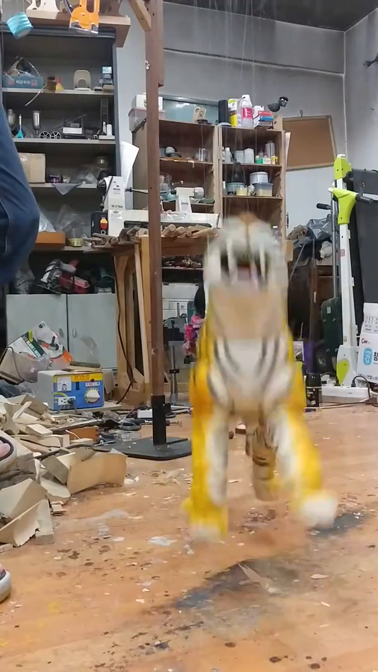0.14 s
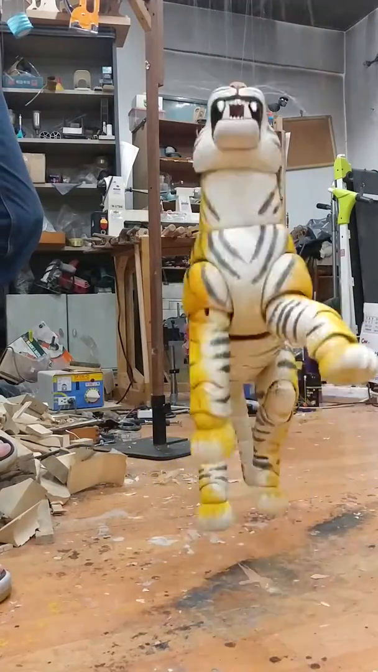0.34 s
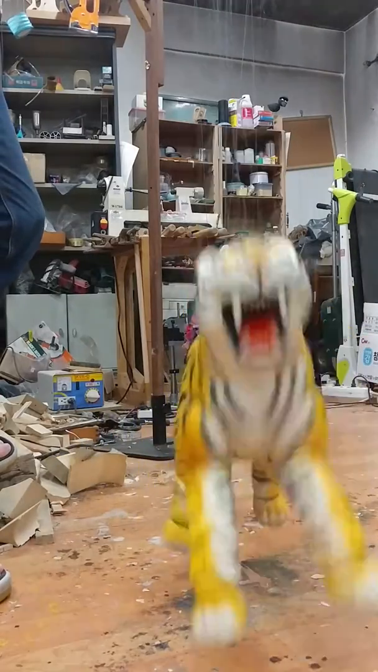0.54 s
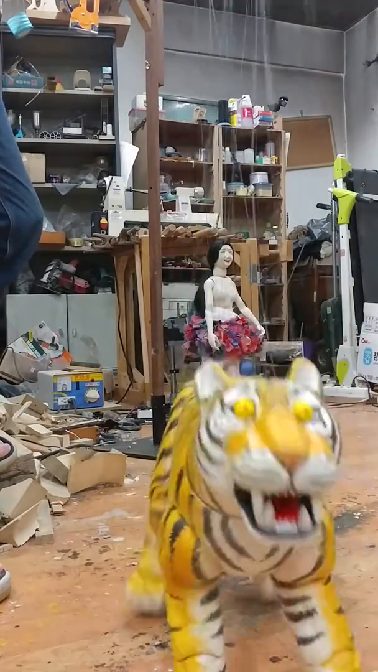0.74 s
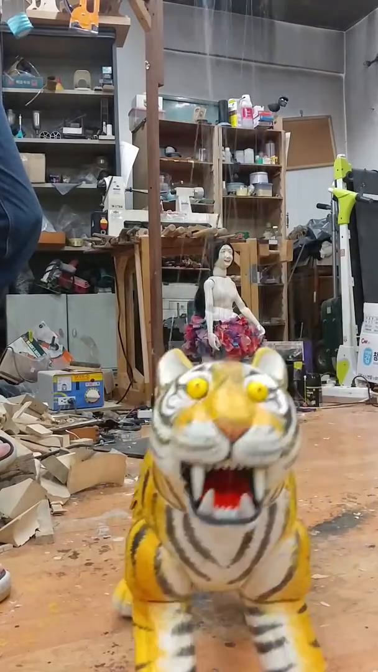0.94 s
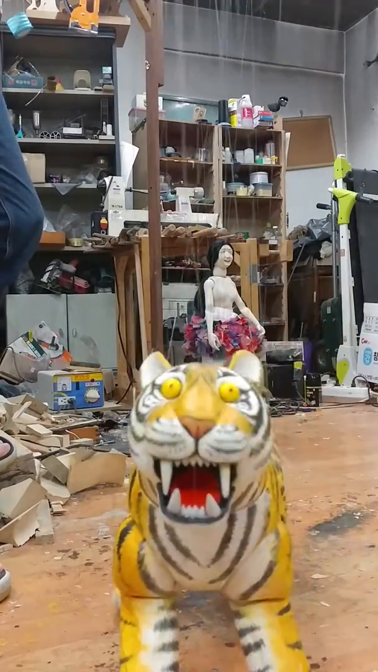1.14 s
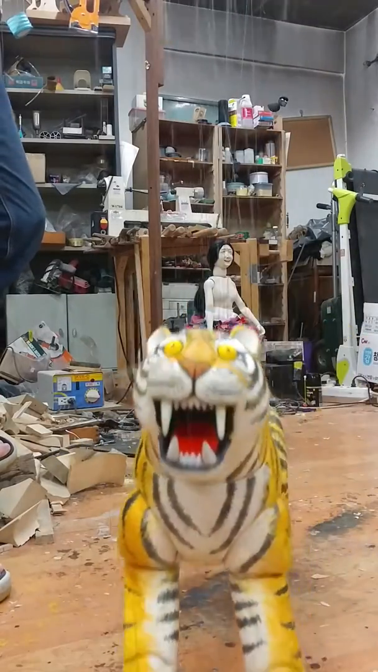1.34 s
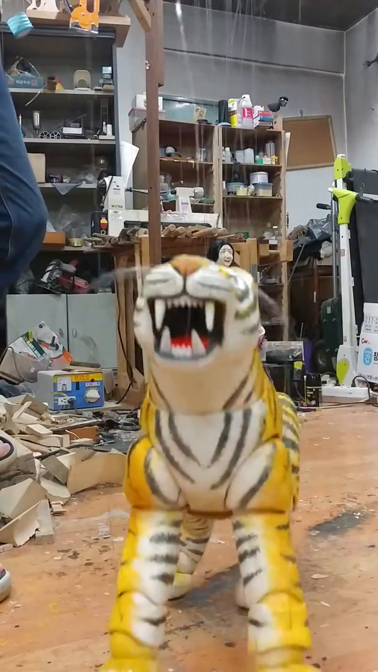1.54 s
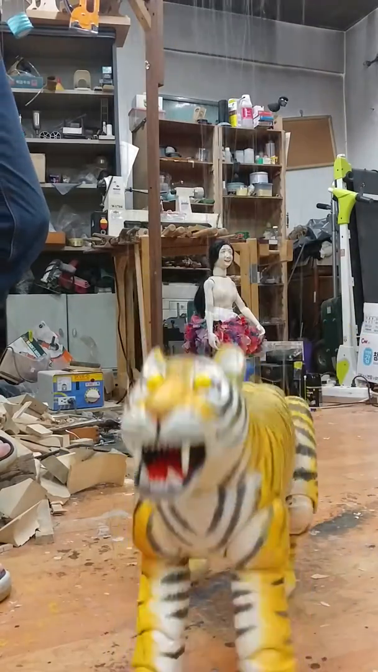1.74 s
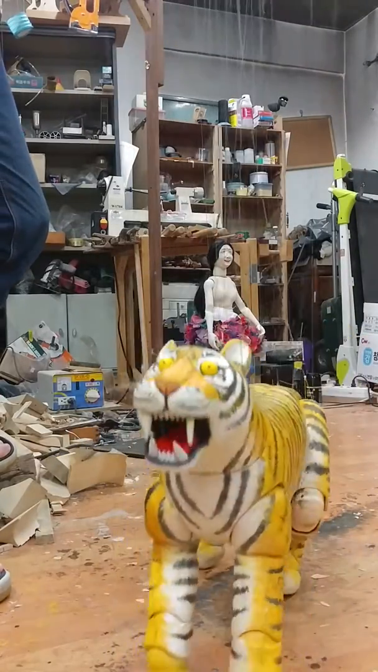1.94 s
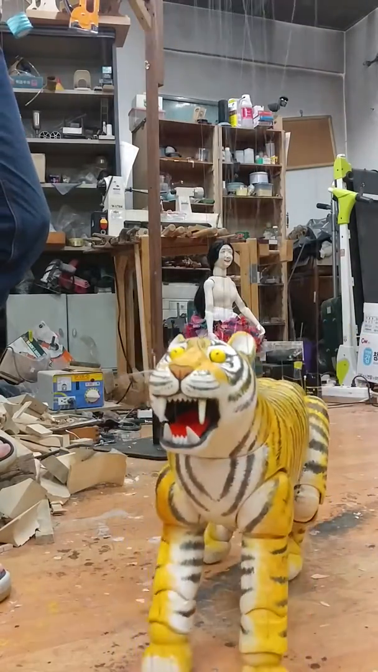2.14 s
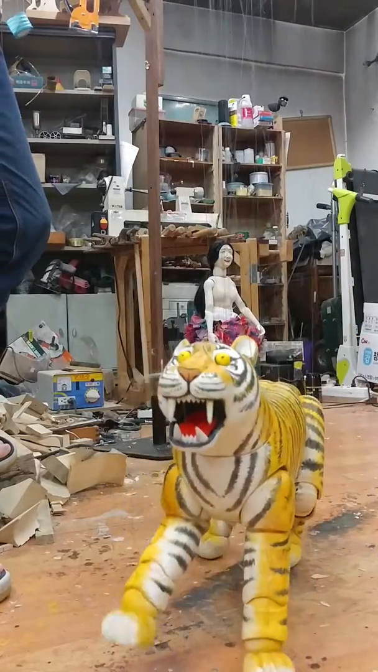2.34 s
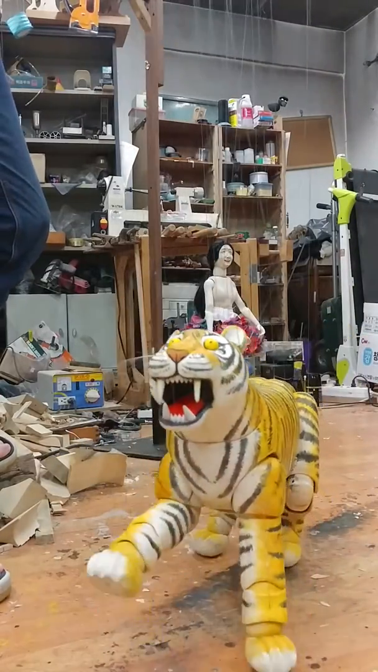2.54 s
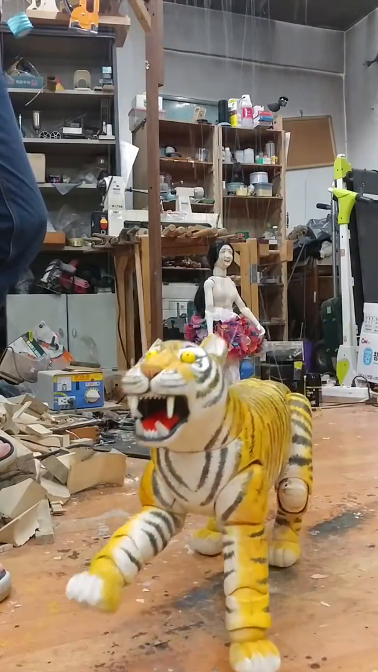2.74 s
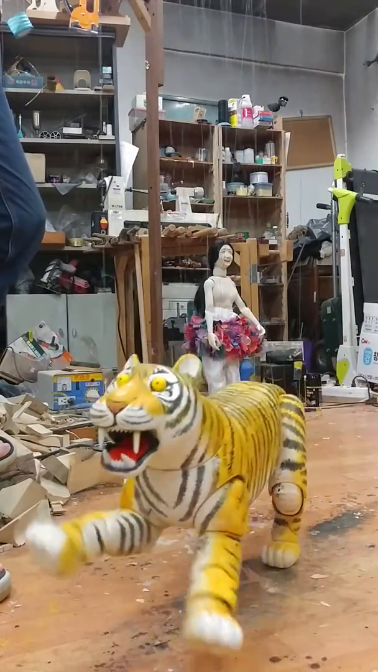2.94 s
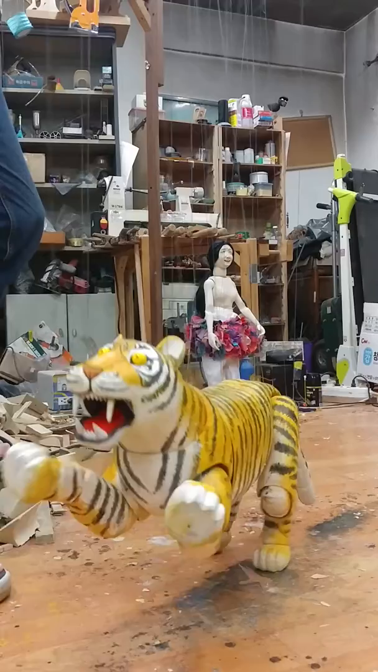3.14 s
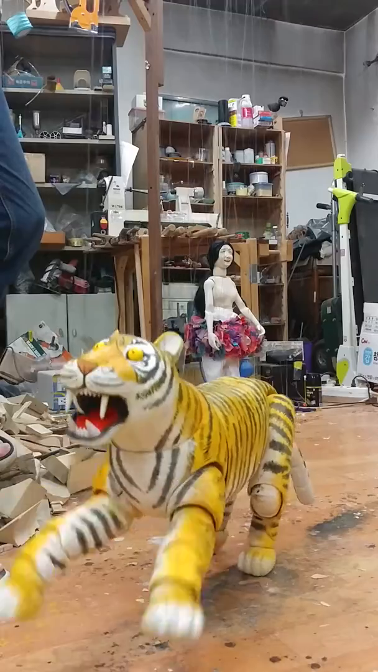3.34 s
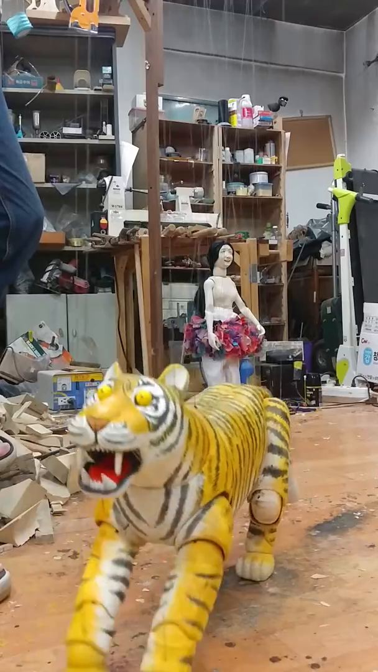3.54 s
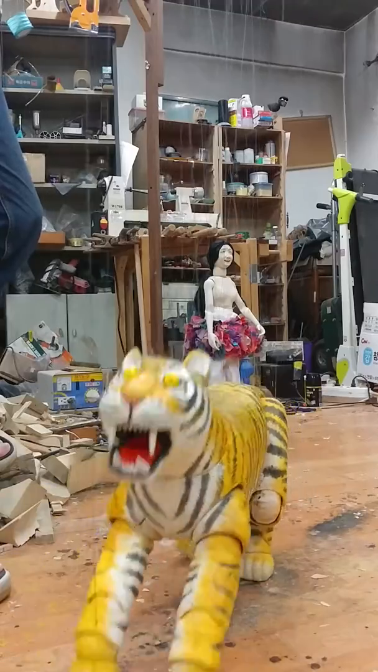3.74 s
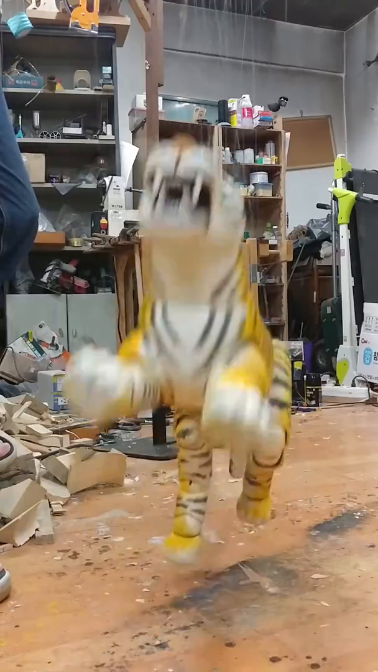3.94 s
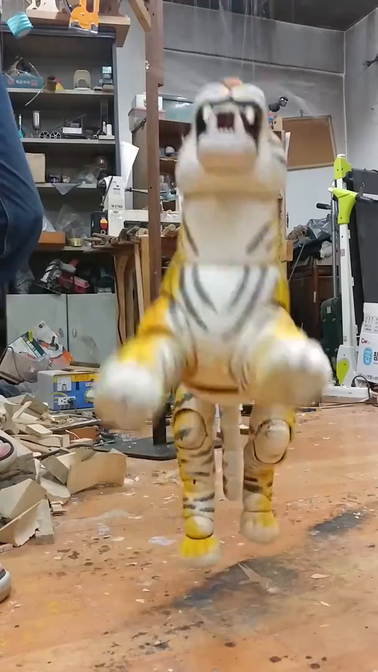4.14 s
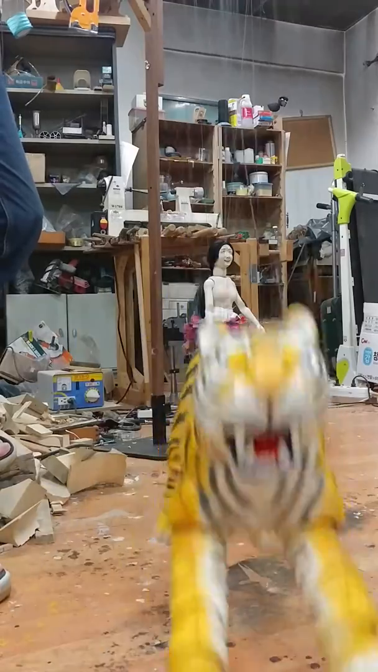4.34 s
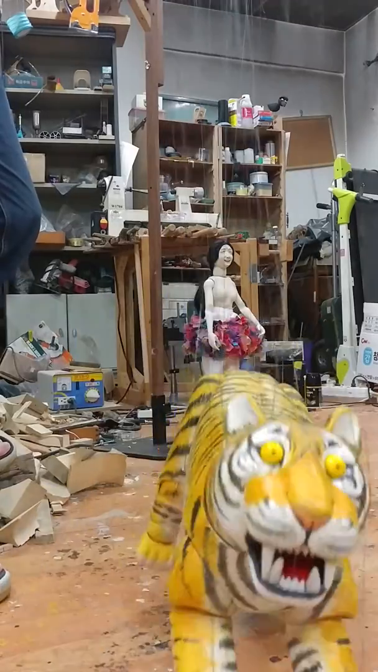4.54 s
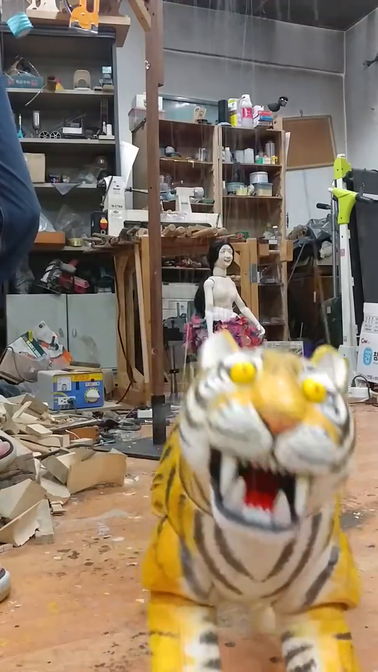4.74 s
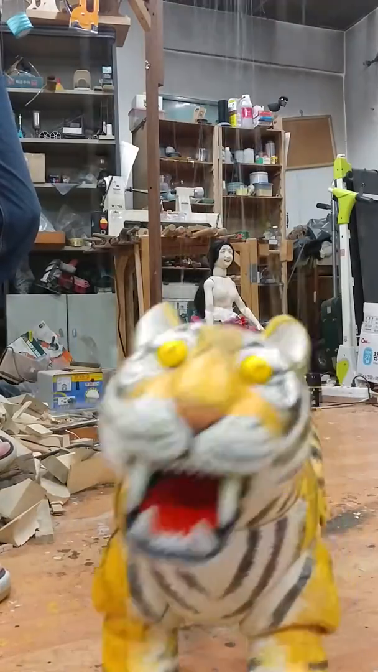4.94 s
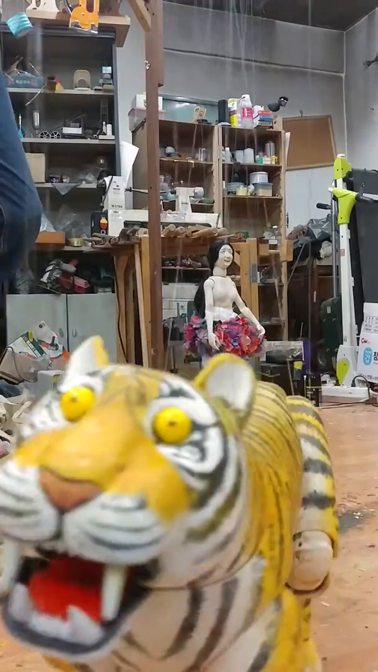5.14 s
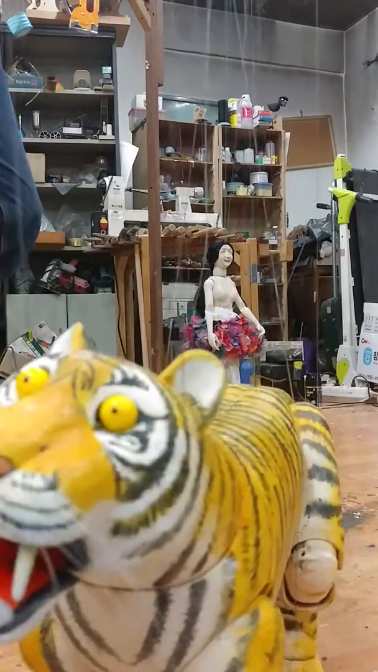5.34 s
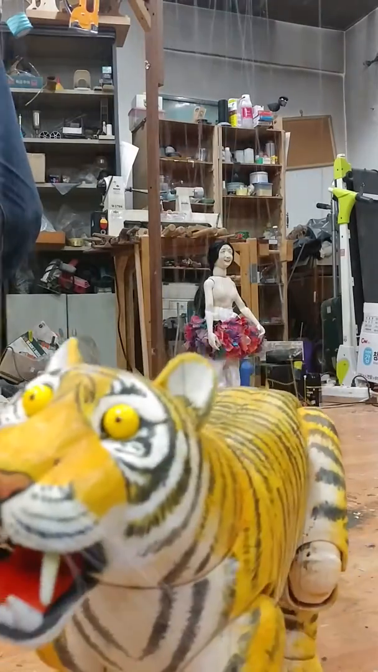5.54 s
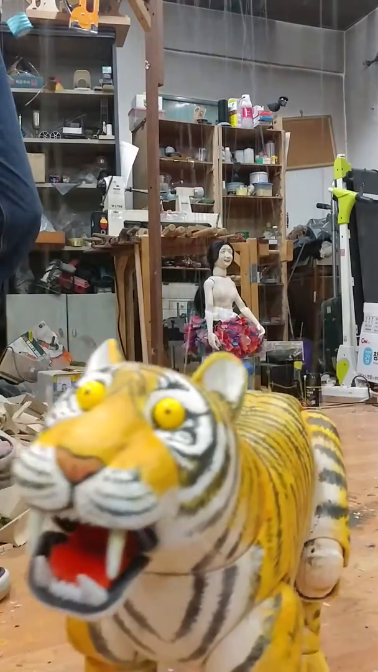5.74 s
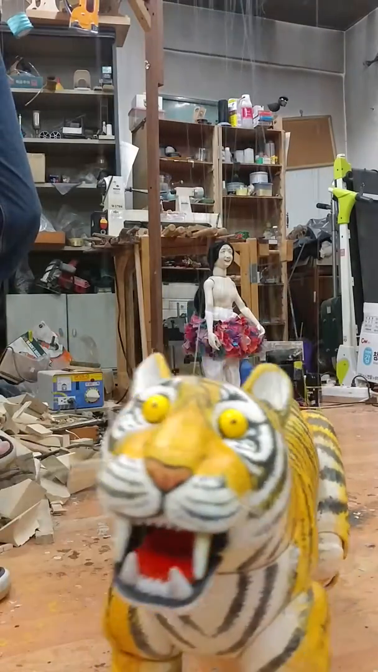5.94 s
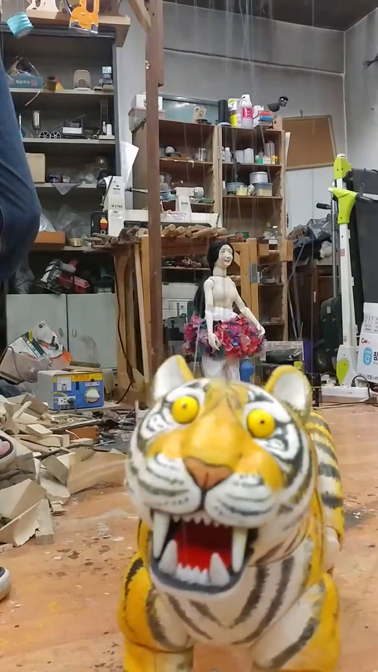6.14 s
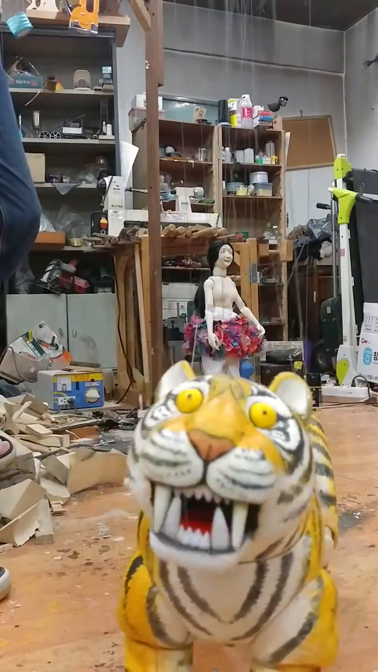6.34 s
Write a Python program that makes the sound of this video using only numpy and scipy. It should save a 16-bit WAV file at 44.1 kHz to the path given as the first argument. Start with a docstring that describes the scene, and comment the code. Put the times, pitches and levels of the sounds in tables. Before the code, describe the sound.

A jointed wooden tiger puppet is jumped on a plank floor. A loud, dense clatter of hollow thumps and sharp clacks fills the first second, then it fades to faint rustles. A short hard landing follows near two seconds, then tiny ticks, a medium clattering burst after four seconds, and smaller knocks fading away. Close stereo microphones, short dry workshop echo, light hiss.

```python
"""Cluttered workshop, plank floor: a carved wooden puppet on strings is jumped and walked.
Hollow body and paws thump and joints clack: decaying sines, plus noise cracks on the joints.
Dragged parts chatter and rasp, and lifted ones rustle: sprayed knocks and shaped noise.
Sparse workshop echoes follow; a narrow low noise band near 54 Hz rises with the knocks.
Two spaced microphones add level and time differences and their own hiss."""
import sys
import numpy as np
from scipy import signal
from scipy.fft import rfft, irfft, next_fast_len
from scipy.io import wavfile
from scipy.ndimage import uniform_filter1d

SR = 44100
rng = np.random.default_rng(int(sys.argv[2]) if len(sys.argv) > 2 else 0)


def bounce(signal):
    """Save signal as a 16-bit WAV file at the path given by the first command-line argument."""
    frames = np.transpose(np.atleast_2d(signal))
    limited = np.clip(frames, -1, 1)
    pcm = np.round(limited * 32767).astype(np.int16)
    wavfile.write(sys.argv[1], SR, pcm)


N = 285327

# Paw and body landings, levels before pan and echo: start_s, peak_db, pitch_hz
LANDINGS = [(0.0, -20, 192), (0.007, -17, 273), (0.068, -22, 380), (0.102, -23.5, 390), (0.21, -15.5, 308),
            (0.229, -24.5, 296), (0.531, -20.5, 299), (0.548, -27, 320.2), (0.617, -24.5, 336),
            (0.65, -27, 334), (0.704, -19.5, 226), (0.743, -13.5, 366), (0.756, -18.5, 208),
            (0.785, -31, 382), (0.819, -21, 218), (0.856, -13.5, 359), (0.921, -27, 330),
            (0.967, -27.5, 393), (1.078, -36.5, 215), (1.199, -45, 460), (1.499, -46, 379),
            (1.754, -34.5, 413), (1.77, -24, 220), (1.792, -16.5, 215), (1.813, -22.5, 222),
            (1.868, -20, 362), (1.989, -43.5, 202), (2.061, -48, 410), (2.097, -43.5, 362),
            (2.251, -49, 396), (2.292, -44, 409), (2.529, -51, 435), (2.846, -46.5, 239),
            (3.011, -41.5, 414), (3.033, -38.5, 393), (3.416, -44.5, 390), (3.507, -51, 360),
            (3.61, -38.5, 200), (4.037, -37, 355), (4.049, -34, 360), (4.31, -34, 362), (4.343, -25.5, 368),
            (4.379, -25.5, 390), (4.442, -28, 340), (4.49, -21, 195), (4.6, -23, 370), (4.864, -49, 423),
            (4.913, -43, 410), (4.997, -42.5, 501), (5.054, -30, 190), (5.142, -38.5, 188),
            (5.197, -33.5, 393), (5.566, -53.5, 373), (5.661, -56, 447), (5.948, -48.5, 173),
            (6.373, -44, 503), (6.414, -53.5, 248)]
# Joints knocking wood on wood: start_s, knock_peak_db, pitch_hz, crack_re_knock_db
JOINT_KNOCKS = [(0.0, -16, 950, 7), (0.008, -11, 2780, -12.5), (0.019, -10.5, 2060, -1.5),
                (0.045, -16.5, 3140, -14), (0.095, -17.5, 1500, -2.5), (0.115, -25, 1970, 3),
                (0.21, -25, 726, -53), (0.345, -40, 1017, -9), (0.532, -28.5, 950, -41),
                (0.569, -19, 1420, -30), (0.573, -21.5, 1250, -19), (0.577, -19.5, 3050, -22),
                (0.62, -12, 740, -14), (0.65, -28.5, 3000, -7), (0.672, -17, 920, -4.5),
                (0.704, -11, 2240, -7.5), (0.716, -29, 2080, -6.5), (0.749, -27, 2600, -15),
                (0.784, -23, 1410, -28), (0.793, -19.5, 710, -18), (0.819, -14.5, 764, -13),
                (0.859, -20.5, 970, -5), (0.969, -35, 1430, -23), (0.967, -36, 3400, -30),
                (1.014, -33.5, 1520, -12.5), (1.177, -46, 980, -23.5), (1.198, -41.5, 830, -10.5),
                (1.769, -22, 2680, -0.5), (1.78, -16.5, 2880, -16), (1.788, -21.5, 1370, 5),
                (1.795, -17.5, 980, -1), (1.814, -20, 870, 0), (1.991, -35, 3030, -21),
                (2.842, -54.5, 950, 6.5), (2.88, -48, 2080, -10.5), (3.029, -44, 1580, -17),
                (3.166, -47, 1720, -19), (3.201, -61, 1500, -10), (3.232, -48, 1725, -21),
                (3.522, -50.5, 1500, -29), (3.613, -40.5, 800, -10), (3.938, -43.5, 2030, 6),
                (3.956, -41.5, 2520, -12), (3.978, -36.5, 2900, -11), (4.047, -41, 990, -4),
                (4.101, -43, 945, -1), (4.114, -39, 1070, -24), (4.136, -36.5, 1620, 0.5),
                (4.211, -40, 816, -31), (4.249, -41.5, 1150, -7), (4.278, -26.5, 1430, -21),
                (4.302, -24.5, 1900, -4), (4.318, -32.5, 2800, -1), (4.347, -17, 815, -16),
                (4.377, -20.5, 2860, -14), (4.435, -26.5, 810, -17), (4.491, -18.5, 2240, 2.5),
                (4.503, -35, 2140, -10), (4.6, -30.5, 787, -38), (4.652, -31, 1940, -14),
                (4.676, -43.5, 2900, -21), (4.796, -49, 2080, -8), (4.818, -47, 2330, -4),
                (4.855, -46, 1990, -28), (4.905, -53.5, 3000, 9.5), (4.914, -34.5, 890, -11),
                (4.93, -40, 890, -10), (4.989, -37.5, 2420, -15), (4.996, -38.5, 810, -28),
                (5.009, -37, 1220, -11), (5.111, -32, 1650, -15), (5.124, -28, 1490, -18),
                (5.139, -32.5, 660, 0), (5.163, -28, 778, -24), (5.236, -47.5, 1505, 9),
                (5.485, -53.5, 950, -17.5), (5.566, -49, 790, -28), (5.654, -57, 2630, -12.5),
                (6.028, -55.5, 2700, -1.5), (6.372, -38, 2900, -20.5)]
# Hollow body modes: mode_hz, relative_db, t60_s
BODY_MODES = [(120, -24, .07), (172, -6, .09), (198, 0, .11), (226, 0, .09), (291, 0, .075), (325, -3, .06),
              (364, 0, .055), (405, 0, .05), (465, -3, .045), (555, -4, .035)]
# Leg and joint modes: mode_hz, relative_db, t60_s
LIMB_MODES = [(623, 0, .03), (790, 0, .025), (890, 0, .022), (990, 0, .025), (1100, -3, .02),
              (1342, 1, .03), (1463, 1, .03), (1650, -1, .025), (1845, -3, .02), (2060, 1, .03),
              (2210, 0, .025), (2500, -3, .02), (2850, 3, .028), (3080, 0, .018), (3430, 2, .028),
              (3800, -5, .016), (4100, -7, .015), (5000, -9, .012)]
# Colour of cracks and rasp: freq_hz, relative_db
TREBLE_COLOUR = [(1500, -7.5), (4000, -7), (6000, -10), (7200, -18.5), (8800, -12), (10500, -27),
                 (13000, -19.5), (16000, -40.5)]
# Parts dragging after a move: start_s, length_s, level_db, pitch_hz, hiss_re_drag_db, rise_s
DRAGS = [(0.0, 0.25, -26.5, 1560, -9.5, 0.0026), (0.216, 0.12, -32.5, 1030, -23, .006),
         (0.552, 0.23, -28.5, 1540, -11.5, 0.03), (0.704, 0.3, -28.5, 1610, -7.5, 0.0037),
         (0.958, 0.11, -37.5, 1090, -15, 0.0048), (1.168, .13, -45.5, 1040, -15, 0.046),
         (1.776, 0.18, -34.5, 1850, -2.5, 0.024), (1.986, 0.039, -50.5, 890, -22, .004),
         (2.045, 0.1, -61.5, 780, -1, .03), (2.825, 0.19, -59.5, 1506, -4.5, 0.035),
         (2.997, 0.17, -57, 1230, -6, 0.041), (3.513, 0.08, -57.5, 1150, -14, 0.01),
         (3.599, 0.1, -50.5, 2390, -15, 0.02), (3.823, 0.13, -61, 1740, -9.5, 0.08),
         (3.934, 0.17, -50.5, 2580, -14, 0.033), (4.077, 0.13, -54.5, 1350, -0.5, 0.066),
         (4.274, 0.48, -35.5, 1570, -10, 0.0039), (4.44, 0.084, -32.5, 860, -23, .008),
         (4.488, .11, -37.5, 2140, 4, 0.0035), (4.594, 0.1, -48, 1770, -8.5, 0.0091),
         (4.784, 0.21, -55, 2360, -33, .01), (4.908, 0.074, -50, 1250, -3.5, 0.011),
         (4.95, 0.12, -54.5, 2370, -15, 0.037), (5.03, 0.086, -48.5, 1670, -14, 0.038),
         (5.105, 0.15, -43, 1570, -3.5, 0.012)]
# Faint bright rustling of the lifted or swayed puppet: start_s, length_s, level_db
LIFT_RUSTLES = [(0.308, 0.22, -60), (0.482, 0.29, -50), (1.252, 0.46, -64), (1.688, 0.37, -52),
                (1.93, 0.32, -55.5), (2.098, 0.086, -57), (2.211, 0.19, -60), (3.129, 0.25, -62.5),
                (3.219, 0.3, -63.5), (3.796, 0.36, -60.5), (3.94, 0.044, -58), (5.212, 0.1, -60.5)]
# Microphone level difference by band: freq_hz, left_re_right_db
MIC_BALANCE = [(150, -0.5), (1000, 0), (1650, -3), (2400, 1.5), (5000, 1.5), (6800, 4), (8800, 12),
               (10500, 8.5), (12500, 1.5), (15500, -6)]
# Workshop echo decay: freq_hz, t60_s
SHOP_DECAY = [(100, 0.24), (300, 0.22), (800, 0.26), (2000, 0.2), (5000, 0.3), (12000, 0.07)]
# Room tone and hiss spectrum: freq_hz, relative_db_per_hz
AIR_COLOUR = [(18, -42), (30, -18.5), (69, 3), (156, -16), (236, -5), (307, -13.5), (590, -15.5),
              (1200, -27), (4300, -31.5), (7850, -30.5), (10700, -36), (12900, -27), (15500, -34)]
# Left-right likeness of the room tone: freq_hz, correlation_0_to_1
AIR_LIKENESS = [(60, .87), (130, .63), (290, .6), (640, .36), (1400, .05), (3000, 0)]
# Thin bands in the hiss: centre_hz, width_hz, rms_db
WHINE_BANDS = [(11400, 200, -98.5), (13330, 560, -92), (14005, 220, -98.5)]

CHATTER_PER_S, CHATTER_MAX = 1.9, 0.71  # knock share of a drag grows with its length
RUSTLE_TAPS_DB = -11  # tiny knocks under the rustle
RUMBLE_REST_DB, RUMBLE_DRIVE_DB = -70, -33  # resting level; gain on the part that follows the knocks
AIR_RMS_DB = -63.5
BASS_CUT_HZ, TREBLE_EDGE_HZ = 38.0, 15700


def thumps():
    """Soft, heavy blows excite only the low hollow modes; the deepest favour the right side."""
    out = np.zeros((2, N))
    chances = rng.standard_normal((len(LANDINGS), 2, len(BODY_MODES), 1))
    for (start_s, peak_db, pitch_hz), chance in zip(LANDINGS, chances):
        blow = ring(BODY_MODES, pitch_hz, octaves=.125, chance=chance,
                    scatter_db=1.5, detune=.02, rise_s=.002)
        pan_db = read([(210, -3), (300, 1.5)], pitch_hz)
        add(out, start_s, gain_of(peak_db) * blow, pan_db, lag=9)
    return out


def clacks():
    """Hard, light blows: ringing limb modes plus a noise crack of a few milliseconds."""
    out = np.zeros((2, N))
    count = len(JOINT_KNOCKS)
    chances = rng.standard_normal((count, 2, len(LIMB_MODES), 1))
    t = np.arange(SR // 8) / SR
    cracks = colour(rng.standard_normal((count, len(t))) * np.exp(-t / .003), TREBLE_COLOUR)
    lags = rng.integers(-11, 15, count)  # random small time offset between the sides, in samples
    for (start_s, peak_db, pitch_hz, crack_db), chance, crack, lag in zip(
            JOINT_KNOCKS, chances, cracks, lags):
        knock = ring(LIMB_MODES, pitch_hz, octaves=.4, chance=chance,
                     scatter_db=2., detune=.015, rise_s=.00025)
        crack = gain_of(crack_db) * crack / abs(crack).max()
        add(out, start_s, gain_of(peak_db) * (knock + crack), pan_db=1, lag=lag)
    return out


def ring(modes, near_hz, octaves, chance, scatter_db, detune, rise_s):
    """A blow rings the modes nearest its pitch; chance shifts and weights them. Peak 1."""
    mode_hz, mode_db, t60_s = np.transpose(modes)[:, :, None]
    t = np.arange(SR // 8) / SR
    nearness = 1 / (1 + (np.log2(mode_hz / near_hz) / octaves) ** 2)
    share = gain_of(mode_db + scatter_db * chance[0]) * nearness
    share = share * np.where(mode_hz > 600, np.sign(chance[1]), 1)  # high modes: either polarity
    waves = np.sin(2 * np.pi * mode_hz * (1 + detune * chance[1]) * t)
    decays = gain_of(-60 * t / t60_s)
    sound = (share * decays * waves).sum(0) * (1 - np.exp(-t / rise_s)) ** 2
    return sound / abs(sound).max()


def scuffs():
    """Tiny knocks and sliding-wood rasp swell and fade with each drag; rustles are mostly hiss."""
    taps, rasp = tap_spray(), wood_rasp()
    hiss = evened(colour(rasp, TREBLE_COLOUR))
    out = np.zeros((2, N))
    for start_s, length_s, level_db, pitch_hz, hiss_db, rise_s in DRAGS:
        span = slice(round(start_s * SR), round((start_s + length_s) * SR))
        chatter = min(CHATTER_PER_S * length_s, CHATTER_MAX)
        rub_colour = [(60, -40), (pitch_hz / 3, -11), (pitch_hz, 0),
                      (pitch_hz * 1.5, -11), (pitch_hz * 4, -40)]
        rub = evened(colour(through_limbs(rasp[:, span]), rub_colour))
        tap_colour = [(pitch_hz / 4, -9), (pitch_hz, 0), (pitch_hz * 4, -6)]
        near_taps = evened(colour(taps[:, span], tap_colour))
        drag = chatter * near_taps + (1 - chatter) * rub + gain_of(hiss_db) * hiss[:, span]
        out[:, span] += gain_of(level_db) * swell(rub.shape[1], rise_s) * drag
    for start_s, length_s, level_db in LIFT_RUSTLES:
        span = slice(round(start_s * SR), round((start_s + length_s) * SR))
        rustle = hiss[:, span] + gain_of(RUSTLE_TAPS_DB) * taps[:, span]
        out[:, span] += gain_of(level_db) * swell(rustle.shape[1], 0.23 * length_s) * rustle
    return out


def tap_spray():
    """About 240 random limb knocks per second, drawn from twelve voices, with echoes."""
    sizes = gain_of(3.2 * np.minimum(rng.exponential(1, N), 4)) * (rng.random(N) < 240 / SR)
    voice = rng.integers(0, 12, N)
    chances = rng.standard_normal((12, 2, len(LIMB_MODES), 1))
    taps = np.zeros(N)
    for k, chance in enumerate(chances):
        near_hz = 1500 * 2 ** chance[0, 0, 0]
        knock = ring(LIMB_MODES, near_hz, octaves=1.2, chance=chance,
                     scatter_db=4., detune=.02, rise_s=.0002)
        taps += signal.oaconvolve(sizes * (voice == k), knock[:2000])[:N]
    return evened(taps + shop(taps[None], wet_db=-4.0))


def wood_rasp():
    """Flickering friction noise; long waves reach both sides."""
    flicker_db = 1.5 * evened(uniform_filter1d(rng.standard_normal(N), 300))
    rasp = rng.standard_normal((2, N)) * gain_of(flicker_db)
    return rasp + 0.82 * colour(rasp[::-1], [(500, 11), (1100, -27.0)])


def through_limbs(x):
    """Rubbing sets the limb modes singing, over a gain floor of .7 below the lowest and .3 above."""
    mode_hz, mode_db, t60_s = np.transpose(LIMB_MODES)[:, :, None]
    size = next_fast_len(x.shape[-1])
    hz = np.fft.rfftfreq(size, 1 / SR)
    peaks = np.sqrt((gain_of(2 * mode_db) / (1 + ((hz - mode_hz) * t60_s / 1.5) ** 2)).sum(0))
    response = np.maximum(peaks, np.where(hz < mode_hz[0], .7, .3))
    return irfft(rfft(x, size) * response, size)[..., :x.shape[-1]]


def swell(length, rise_s):
    """Rises for rise_s, held within 1 ms and 80 % of the span, then fades to nothing."""
    t = np.arange(length) / SR
    top_s = np.clip(rise_s, .001, .8 * t[-1])
    rise = np.sin(np.pi / 2 * np.minimum(t / top_s, 1)) ** 2
    fade = (1 - np.clip((t - top_s) / (t[-1] - top_s), 0, 1)) ** 1.24
    return rise * fade


def turning_echoes(x, wet_db):
    """Three echo patterns take turns, weighted by 7 Hz cosines, so no single colour stands out."""
    turn = 2 * np.pi * 7 * np.arange(N) / SR
    return sum(shop(x * np.sqrt(2 / 3) * np.cos(turn + k * np.pi / 3), wet_db) for k in range(3))


def shop(x, wet_db):
    """Sparse echoes die band by band; long waves reach both microphones alike, short ones do not."""
    taps = np.zeros((2, SR // 2))
    at = np.arange(120, SR // 2 - 20, 20) + rng.integers(0, 20, (2, (SR // 2 - 121) // 20))
    np.put_along_axis(taps, at, rng.choice([-1., 1.], at.shape), 1)  # one echo per 20 samples
    hz, t, z = signal.stft(taps, SR, nperseg=512)
    same = read([(450, 1.0), (1200, 0.017)], hz).clip(0, 1)[:, None]
    z = np.array([z[0], same * z[0] + np.sqrt(1 - same ** 2) * z[1]])
    decay = gain_of(-60 * t / read(SHOP_DECAY, hz)[:, None])
    tail = signal.istft(z * decay, SR, nperseg=512)[1]
    tail = tail / np.linalg.norm(tail[0])
    return gain_of(wet_db) * signal.fftconvolve(x, tail, axes=1)[:, :N]


def facing(x):
    """The left microphone faces the puppet: levels split by band, mean amplitude gain kept."""
    hz, db = np.transpose(MIC_BALANCE)
    mean_db = 20 * np.log10(np.cosh(db * np.log(10) / 40))
    left = colour(x[0], np.c_[hz, db / 2 - mean_db])
    right = colour(x[1], np.c_[hz, -db / 2 - mean_db])
    return np.array([left, right])


def rumble(knocks):
    """A narrow low rumble near 54 Hz that rises with the smoothed level of the knocks."""
    power = uniform_filter1d(uniform_filter1d(knocks ** 2, SR // 12), SR // 20)
    knock_level = np.sqrt(abs(power))
    level = gain_of(RUMBLE_REST_DB) + gain_of(RUMBLE_DRIVE_DB) * knock_level ** .6
    return level * band_noise(hz=54., width_hz=10.)


def air():
    """Room tone and microphone hiss: partly shared noise, drifting patches, thin high bands."""
    frames, hz = N // 256 + 5, np.fft.rfftfreq(1024, 1 / SR)
    a, b, c, d, patches = rng.standard_normal((frames, 513, 5)).T
    patches_db = evened(uniform_filter1d(uniform_filter1d(patches, 12, 0), 14, 1))  # 1 dB rms
    same = np.clip(read(AIR_LIKENESS, hz), -1, 1)[:, None]
    left = a + 1j * b
    right = same * left + np.sqrt(1 - same ** 2) * (c + 1j * d)
    z = np.array([left, right]) * gain_of(read(AIR_COLOUR, hz)[:, None] + patches_db)
    tone = signal.istft(z, nperseg=1024, noverlap=768)[1][:, :N]
    whine = np.array([sum(gain_of(db) * band_noise(centre_hz, width_hz)
                          for centre_hz, width_hz, db in WHINE_BANDS) for side in "LR"])
    return gain_of(AIR_RMS_DB) * evened(tone) + whine


def band_noise(hz, width_hz):
    """Low-passed complex noise shifted up to one frequency, rms 1."""
    r = np.exp(-np.pi * width_hz / SR)
    noise = rng.standard_normal(N) + 1j * rng.standard_normal(N)
    slow = signal.lfilter([1], [1, -2 * r, r * r], noise)
    return evened((slow * np.exp(2j * np.pi * hz * np.arange(N) / SR)).real)


def add(mix, start_s, sound, pan_db, lag):
    """Spaced-pair placing: pan_db is left minus right; left hears it lag samples after right."""
    waits = max(lag, 0), max(-lag, 0)
    for side, db, wait in zip(mix, (pan_db / 2, -pan_db / 2), waits):
        part = side[round(start_s * SR) + wait:][:len(sound)]
        part += gain_of(db) * sound[:len(part)]


def colour(x, points):
    """Shapes a spectrum by a table of freq_hz, gain_db."""
    size = next_fast_len(x.shape[-1])
    gain = gain_of(read(points, np.fft.rfftfreq(size, 1 / SR)))
    return irfft(rfft(x, size) * gain, size)[..., :x.shape[-1]]


def read(points, hz):
    """Interpolates a table on a log-frequency axis."""
    f, value = np.transpose(points)
    return np.interp(np.log(hz + 1), np.log(f + 1), value)


def gain_of(db):
    """Decibels to amplitude factor."""
    return 10 ** (np.asarray(db) / 20)


def evened(x):
    """Scales to rms 1."""
    return x / np.sqrt(np.mean(x ** 2) + 1e-20)


def scene():
    """Blows, echoes and drags, over the low rumble and the room."""
    low, high = thumps(), clacks()
    echoes = turning_echoes(low, wet_db=-9) + turning_echoes(high, wet_db=-8)
    knocks = facing(low + high + echoes + scuffs())
    return knocks + rumble(knocks.mean(0)) + air()


def record(dry):
    """The microphone's bass roll-off, then a steep linear-phase treble limit."""
    bass_cut = signal.butter(3, BASS_CUT_HZ, "high", fs=SR, output="sos")
    thin = signal.sosfilt(bass_cut, dry)
    edge = signal.firwin(1535, TREBLE_EDGE_HZ, window=("kaiser", 9), fs=SR)
    return signal.oaconvolve(thin, edge[None], "same")


dry = scene()
out = record(dry)
bounce(out)
```